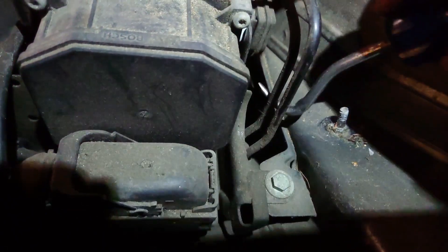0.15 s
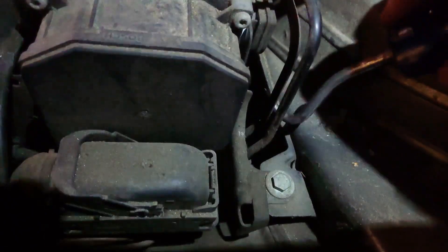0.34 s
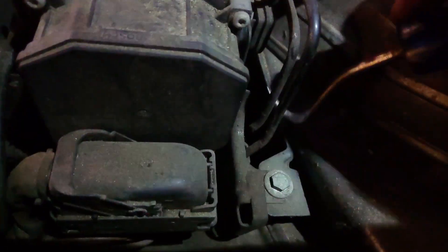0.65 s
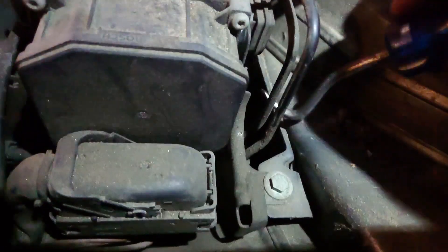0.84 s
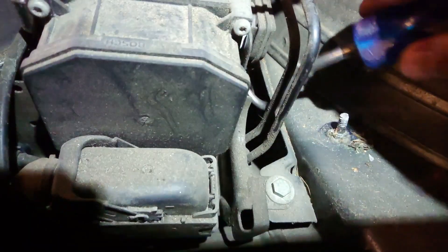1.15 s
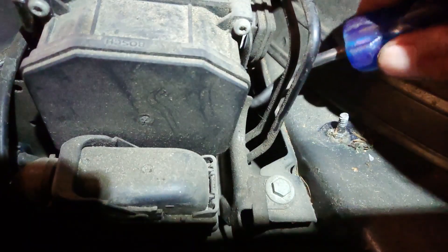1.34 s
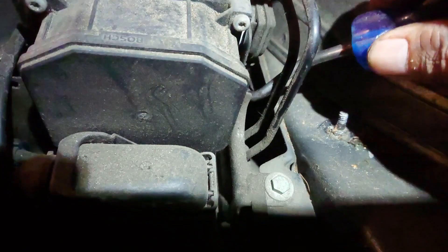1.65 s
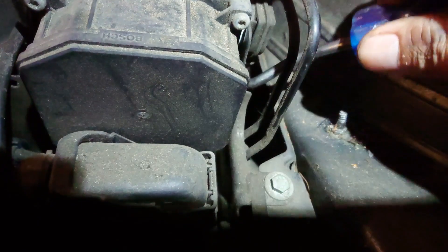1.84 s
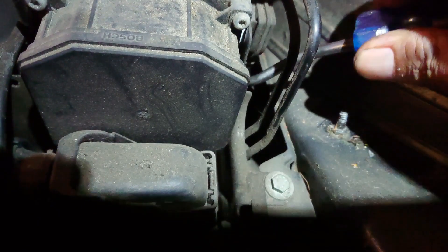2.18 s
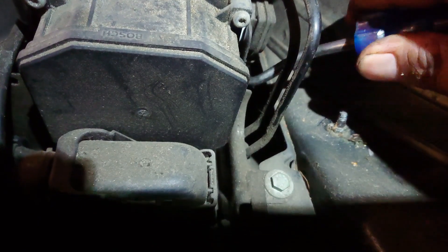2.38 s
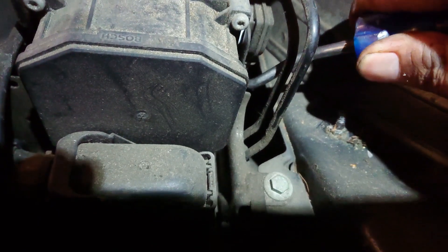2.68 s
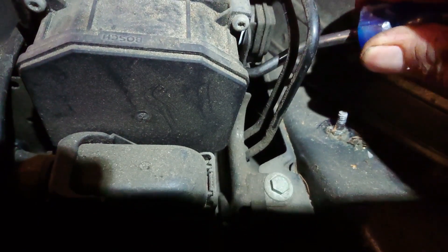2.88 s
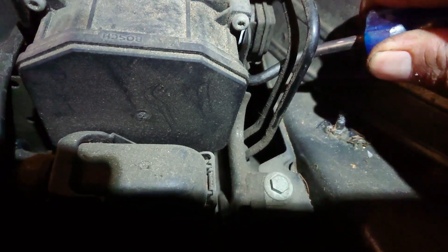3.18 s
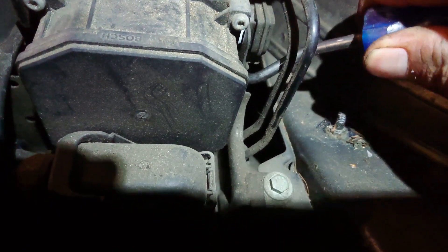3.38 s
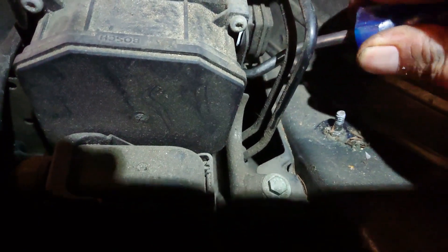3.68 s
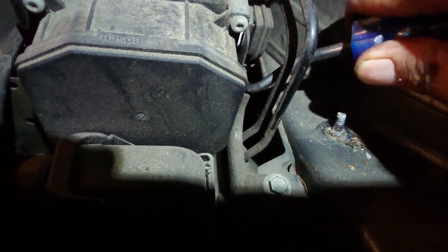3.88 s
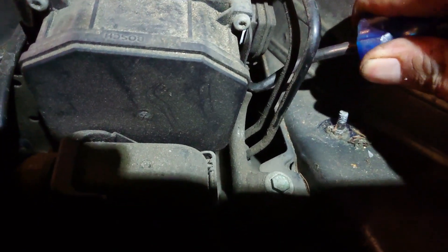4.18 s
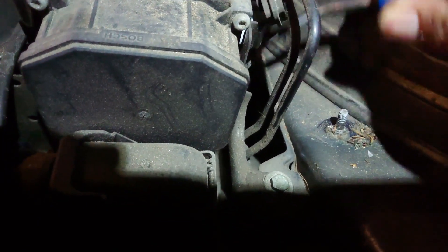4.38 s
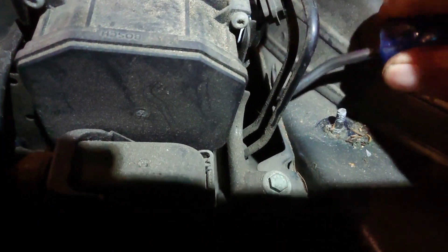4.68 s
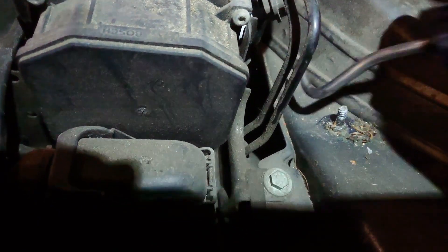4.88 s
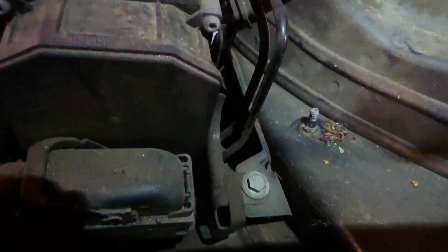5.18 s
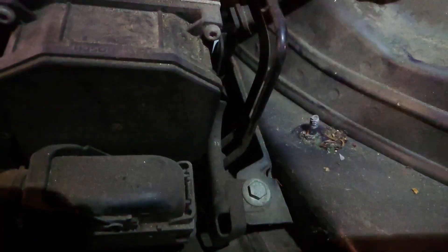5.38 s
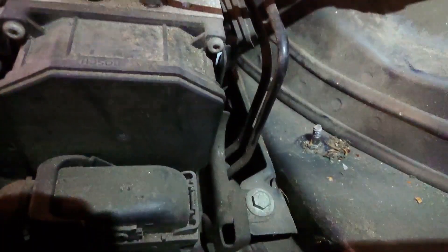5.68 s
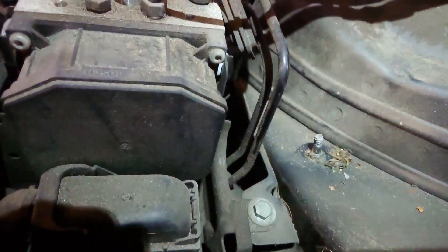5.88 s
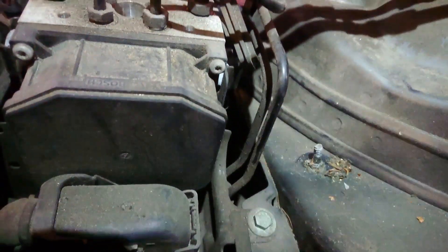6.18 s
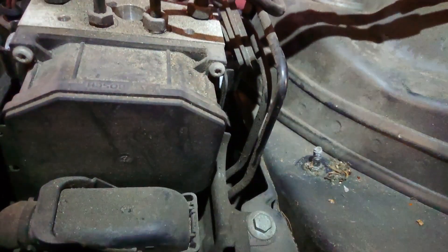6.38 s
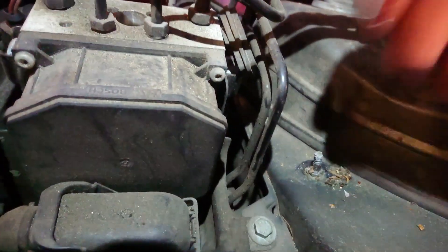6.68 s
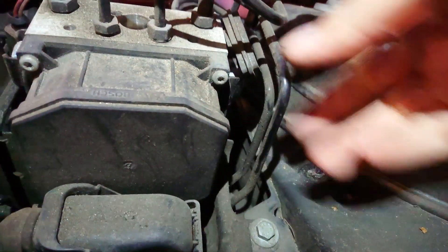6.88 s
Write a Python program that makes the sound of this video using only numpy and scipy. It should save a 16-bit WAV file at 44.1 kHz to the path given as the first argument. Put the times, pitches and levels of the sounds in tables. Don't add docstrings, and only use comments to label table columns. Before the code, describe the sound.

A hooked steel tool scrapes and taps dusty plastic in an engine bay, slips with loud snaps, then clunks and rattles down on a panel.

```python
import sys
import numpy as np
from scipy import signal
from scipy.fft import rfft, irfft
from scipy.io import wavfile
from scipy.ndimage import uniform_filter1d

SR = 44100
rng = np.random.default_rng(int(sys.argv[2]) if len(sys.argv) > 2 else 0)


def convert_level_to_amplitude(level_db):
    exponent = np.asarray(level_db, float) / 20
    return 10 ** exponent


def master(y):
    cut = np.clip(np.atleast_2d(y).T, -1, 1)
    pcm = np.round(cut * 32767)
    wavfile.write(sys.argv[1], SR, pcm.astype(np.int16))


N = 310464

# (frequency [Hz], level [dB per Hz])
AIR_COLOUR = [(15, -43.5), (25, -19), (53, 0.5), (97, -1), (214, -9.5), (273, -12.5), (378, -16.5),
              (553, -16.5), (1060, -17), (1150, -19.5), (1830, -31.5), (2900, -35.5), (7920, -63),
              (11600, -43), (16500, -65.5)]
# (frequency [Hz], likeness [-1 to 1])
AIR_LIKENESS = [(60, 1), (240, 1), (950, -0.55), (3770, -0.19), (15000, 0.79)]
# (frequency [Hz], level [dB])
WHINE = [(1125, -80)]
# (frequency [Hz], time to fall 60 dB [s])
GARAGE_DECAY = [(100, 0.49), (500, 1), (1500, 0.75), (4000, 0.66), (7000, 0.23)]

# (time [s], peak [dB])
THUDS = [
    (3.776, -33.5),
    (4.385, -32),
    (4.9995, -15),
    (5.567, -25.5),
    (5.70, -26.5),
    (5.734, -28),
    (4.993, -36),
    (5.077, -37),
]
# (time [s], peak [dB])
CLUNKS = [
    (5.733, -2),
    (5.743, -17),
    (5.7665, -8),
    (5.779, -8.5),
    (5.80, -24.5),
    (5.953, -2),
    (5.963, -12.5),
]
# (time [s], peak [dB], bass [dB], treble [dB], ring of the spot [Hz])
RATTLE = [(5.566, -7, -25.5, -19.5, 1555), (5.578, -16.5, 13, -10.5, 400), (5.587, -19.5, 3, -6.5, 4920),
          (5.607, -15, -9, -7.5, 5030), (5.629, -29, -12.5, -7, 5500), (5.635, -20, -13, -14, 1970),
          (5.652, -27, -15.5, -15.5, 2530), (5.675, -10, -19.5, -4.5, 5130), (5.6935, -5.5, -11.5, 1, 4000),
          (5.7005, -7, -25, -9, 1540), (5.704, -15, -21, -2.5, 4770), (5.716, -9.5, -10.5, -4.5, 1540),
          (5.723, -10.5, -15, -5.5, 4160), (5.752, -10.5, -2.5, 9, 3300), (5.822, -27.5, -6, -17.5, 5000),
          (5.831, -26.5, -10, -6.5, 4300), (5.866, -35, 4.5, -27, 5020), (5.977, -3, -16, -4, 3220),
          (5.993, -11.5, -3, -3.5, 2550), (6.013, 0, -20.5, -15, 3530), (6.056, -9, -11.5, -8, 3360),
          (6.0945, 0.5, -21, -10.5, 1510), (6.1775, -4, -24, -15.5, 3380),
          (6.197, -23.5, -20.5, -6.5, 3290), (6.2185, -10, -14.5, -7, 2350)]
# (time [s], peak [dB])
BUMPS = [
    (4.9998, -10),
]
# (time [s], peak [dB])
RATCHET = [
    (5.384, -33),
    (5.3895, -36),
    (5.395, -30),
    (5.4045, -22),
    (5.4158, -21.5),
    (5.425, -26),
    (5.436, -38),
]
# (time [s], peak [dB], bass [dB], treble [dB])
SHAFT_PINGS = [
    (1.721, -34, -48, -15),
    (1.894, -28, -55.5, -16.5),
    (1.96, -34, -20, 15.5),
    (4.183, -34, -47, 1),
    (4.262, -25, -17.5, 23),
    (4.499, -24, -42, -7),
]
# (time [s], peak [dB], bass [dB], treble [dB])
TICKS = [(.25, -50, -13, -20), (.533, -64, -27, -9), (1.015, -59, -39, -17), (1.166, -45, -20, -20),
         (1.338, -36, -30, 13), (4.127, -48.5, -22.5, 1), (0.775, -29.5, -22, -35),
         (2.436, -28, -15.5, -25), (2.49, -29.5, -10.5, -19.5), (2.756, -27.5, -7.5, -15),
         (2.7855, -26, -21, -24.5), (3.544, -38.5, -18.5, -14), (3.651, -37.5, 0, 2),
         (3.7165, -17.5, -20, -14), (4.019, -47.5, -25.5, 10), (4.21, -44, -36, 1.5), (4.246, -39, -19, 22),
         (4.787, -33.5, -15.5, -42.5), (5.071, -29.5, -11, -12), (5.0855, -22.5, -11, -11.5)]
# (time [s], peak [dB], bass [dB], treble [dB], ring of the spot [Hz])
TAPS = [(0.146, -27, -20, -44.5, 923), (0.9315, -23, -25, -40.5, 1310), (1.2135, -14.5, -1, -3, 650),
        (1.439, -34, -8.5, -23, 514), (1.551, -36.5, -13.5, -16.5, 2290), (1.7645, -23, -4.5, -19, 732),
        (2.6255, -20, -13, -21, 1140), (2.8735, -13.5, -10.5, -2, 4500), (2.8775, -13.5, -4, -24.5, 765),
        (2.8795, -2.5, -20, -16.5, 4260), (3.761, -21, -17.5, -20.5, 2200), (3.7645, -19, -9, -18.5, 1190),
        (3.7755, -1, -13, -9, 2170), (3.785, -13.5, 10.5, -23, 925), (6.938, -41, 2, -11.5, 930)]
# (time [s], peak [dB], bass [dB], treble [dB], ring of the spot [Hz])
SLIPS = [
    (4.384, -1.5, -15.5, -7, 2200),
    (4.3935, -1.5, -12, -5, 2120),
    (4.401, -0.5, -10, -6, 5500),
    (4.407, -4, -14, 3.5, 3590),
    (4.4125, -8, -6.5, -8, 1000),
    (4.417, -6.5, 0.5, -9, 1299),
    (4.432, -18, 0, -10, 1296),
]

# (start [s], length [s], level [dB], bass [dB], treble [dB])
BUILDING = [(1.185, 0.028, -55, -4, -33), (1.25, 0.049, -56, 1.5, -15), (1.61, 0.058, -59.5, 1.5, -19),
            (1.84, 0.082, -67, 8, -10), (2.53, 0.15, -58, -5.5, -22), (2.84, 0.04, -48, -8, -7.5),
            (3.735, 0.052, -56.5, -14.5, -17), (3.86, 0.041, -43.5, -2.5, -12.5),
            (4.73, 0.16, -52.5, -5.5, -24), (5.09, .074, -60, -2.5, -16), (6.98, 0.074, -68.5, 5, -15.5)]
# (start [s], length [s], level [dB], bass [dB], treble [dB])
SWEEPING = [(0, .12, -61, 6, -28), (.255, 0.063, -63.5, -3, -24), (.36, 0.053, -63.5, -2, -32),
            (.43, 0.075, -59.5, -6, -28), (.97, 0.082, -59.5, 6.5, -29), (1.47, 0.1, -63.5, -6, -13),
            (1.71, 0.04, -45, -10.5, -30), (2.015, 0.1, -53, -21.5, -21), (2.06, 0.062, -48.5, -7.5, -15),
            (2.92, 0.094, -58.5, 3, -13), (3.01, 0.067, -56.5, -9, -27), (3.165, 0.083, -53.5, -6.5, -39),
            (3.445, 0.092, -43.5, -13, -13.5), (4.265, 0.094, -47.5, -10, -4.5),
            (4.85, 0.067, -40, -10, -23)]
# (start [s], length [s], level [dB], bass [dB], treble [dB])
TRAILING = [(.65, 0.26, -64.5, 0.5, -20.5), (1.07, 0.089, -57.5, 0, -28), (1.3, 0.11, -57, 0.5, -10),
            (1.36, 0.072, -45, -12, -14.5), (1.78, 0.08, -52.5, -0.5, -13.5), (1.925, 0.14, -56, -9, -19),
            (2.16, 0.039, -61, -26, -5.5), (2.18, 0.45, -69, -8, -13), (2.62, 0.26, -69.5, 5.5, 0),
            (2.795, 0.12, -55.5, -5, -7), (3.245, 0.084, -54, -0.5, -10.5), (3.37, .06, -63, -22, -5.5),
            (4.05, 0.094, -55, -14, -17), (4.45, .11, -53.5, 0, -22), (4.52, 0.3, -64.5, 3, -41),
            (5.0, 0.12, -49.5, -3, -13), (5.8, 0.094, -50, 13, -25.5), (6.56, .05, -76, -25, -1)]
# (from [s], to [s])
WITHDRAWING = (4.7, 6.5)

# (frequency [Hz], level [dB per Hz])
CHASSIS = [(30, -18), (60, -2.5), (120, 1.5), (250, 0.5), (450, -10), (900, -41), (16500, -89)]
# (frequency [Hz], level [dB per Hz])
HANDLE = [(47, -55), (80, -21.5), (1300, -1.5), (2710, -16), (2900, -28), (4530, -26.5), (6610, -46),
          (13200, -45.5), (16500, -64.5)]
# (frequency [Hz], level [dB per Hz])
PANEL = [(60, -36.5), (297, -8.5), (366, -7.5), (742, -4.5), (1240, 4), (1430, 5), (1540, -0.5), (2090, -4),
         (3500, -3), (5470, -10), (7800, -23.5), (10500, -23.5), (15000, -29), (16500, -49)]
# (frequency [Hz], level [dB per Hz])
BUMP = [(53, -41.5), (90, -6.5), (414, -11), (1750, -18), (2640, -14), (3830, -27), (5080, -17.5),
        (8770, -33.5), (16500, -31)]
# (frequency [Hz], level [dB per Hz])
CLIP = [(120, -28.5), (200, -6), (1050, -4.5), (2330, -4.5), (3630, -13), (5060, -8.5), (5870, -12),
        (7600, -32.5), (8650, -37.5), (10400, -19), (16500, -38.5)]
# (frequency [Hz], level [dB per Hz])
HOUSING = [(35, -38.5), (60, 2), (213, -19.5), (350, -8), (1270, -2.5), (1800, -8), (2300, -3.5),
           (3040, -10), (4430, -4.5), (5600, -6), (7600, -17.5), (10100, -11.5), (14700, -20.5),
           (16500, -52.5)]
# (frequency [Hz], level [dB per Hz])
DUST = [(180, -31), (300, 1.5), (987, -4), (1190, 2), (1870, -3), (2360, -2), (2610, -8), (4770, -5.5),
        (5830, -10.5), (7500, -16), (9810, -17.5), (14000, -21), (15700, -21.5), (16500, -39.5)]
# (frequency [Hz], level [dB], time to fall 60 dB [s])
PANEL_MODES = [(400, -14.5, 0.2), (628, -7, 0.055), (903, -4, 0.11), (1078, -14.5, 0.12),
               (1252, 1.5, 0.036), (1555, 7.5, 0.045), (2200, -14.5, 0.06), (2473, 1.5, 0.057),
               (3290, -5, 0.084), (3590, -6.5, 0.11), (4240, -9.5, 0.043), (5100, -18, 0.091)]
# (frequency [Hz], level [dB], time to fall 60 dB [s])
RATCHET_MODES = [(1660, 12, 0.009), (2500, 2, .008), (5000, 6, 0.008)]
# (frequency [Hz], level [dB], time to fall 60 dB [s])
SHAFT_MODES = [(1950, 6.5, 0.14), (2210, -5, 0.014), (2355, 16, 0.037), (3700, -28, 0.032),
               (5500, -16, 0.038)]
# (frequency [Hz], level [dB], time to fall 60 dB [s])
HOUSING_MODES = [(405, -2.5, 0.27), (650, -7, 0.23), (746, 4.5, 0.1), (925, -5.5, 0.027),
                 (1035, -10.5, 0.21), (1257, 9.5, 0.09), (1356, -0.5, 0.036), (1497, -0.5, .06),
                 (2120, -3.5, 0.029), (2412, 5, 0.047), (2880, -10.5, 0.11), (3340, -12.5, 0.019),
                 (3940, -7.5, 0.013), (4300, -13.5, 0.013)]
# (frequency [Hz], width [Hz], level over the broad colour [dB])
DUST_PEAKS = [(930, 110, 11), (1300, 120, 11), (2300, 170, 12), (3460, 130, 9), (3920, 120, 9),
              (4400, 150, 12), (5300, 170, 11), (10400, 500, 8), (11500, 300, 7), (13500, 400, 6)]


def evened(x):
    return x / np.sqrt(np.mean(x ** 2) + 1e-20)


def read(points, hz):
    f, value = np.transpose(points)
    return np.interp(np.log(hz + 1), np.log(f + 1), value)


def add(mix, s, sound):
    part = mix[:, round(s * SR):][:, :sound.shape[1]]
    part += sound[:, :part.shape[1]]


def causal(db):
    fold = irfft(np.maximum(db, -100) * np.log(10) / 20)
    half = len(fold) // 2
    fold[1:half] *= 2
    fold[half + 1:] = 0
    return np.exp(rfft(fold))


def ports(hz, lag, pan_db, shade_db=0):
    side = np.array([[.5], [-.5]])
    late = lag * (0.38 + 0.63 / (1 + (800 / (hz + 1)) ** 3))
    louder_db = pan_db + shade_db / (1 + (2400 / (hz + 1)) ** 6)
    return convert_level_to_amplitude(side * louder_db) * np.exp(-2j * np.pi * hz * side * late / SR)


def hiss(magnitude, same, turn, size):
    a, b, c, d = rng.standard_normal(magnitude.T.shape + (4,)).T
    left, same = a + 1j * b, np.clip(same, -1, 1)
    right = same * left + np.sqrt(1 - same ** 2) * (c + 1j * d)
    z = np.array([left, right]) * magnitude * turn
    return signal.istft(z, nperseg=size, noverlap=size * 3 // 4)[1][:, :N]


def air():
    size, level_db = 4096, -52
    hz, t = np.fft.rfftfreq(size, 1 / SR), np.arange(N // 1024 + 5) * 1024 / SR
    patches = rng.standard_normal((len(t), len(hz))).T
    patches = uniform_filter1d(patches, size=20, axis=0)
    patches = evened(uniform_filter1d(patches, size=4, axis=1))
    field = convert_level_to_amplitude(read(AIR_COLOUR, hz)[:, None] + 2.7 * patches)
    drone = 1 / (1 + (2 * (hz[:, None] - 63) / 18) ** 2)
    field *= 1 + drone
    alike = read(AIR_LIKENESS, hz)[:, None] - .45
    wash = hiss(field, alike, ports(hz, lag=-0.96, pan_db=2.0)[:, :, None], size)
    wobble = np.cumsum(rng.standard_normal(N)) * .004
    whine = sum(convert_level_to_amplitude(db) * np.sqrt(2) * np.sin(2 * np.pi * f * np.arange(N) / SR + wobble) for f, db in WHINE)
    return convert_level_to_amplitude(level_db) * evened(wash) + whine


def garage(x):
    echoes = np.zeros((2, SR))
    at = np.arange(400, SR - 20, 20) + rng.integers(0, 20, (2, (SR - 401) // 20))
    np.put_along_axis(echoes, at, rng.choice([-1., 1.], at.shape), 1)
    hz, t, z = signal.stft(echoes, SR, nperseg=256)
    fade = convert_level_to_amplitude(-60 * t / read(GARAGE_DECAY, hz)[:, None])
    tail = signal.istft(z * fade, SR, nperseg=256)[1]
    tail = tail[:, :SR - 512] / np.linalg.norm(tail[0])
    return signal.oaconvolve(x.mean(0)[None], tail, axes=1)[:, :N]


def ringing(hz, modes, ring_db, spots, spot_db):
    luck = rng.standard_normal((len(modes), 2))
    crowd = 300 * 16 ** rng.random((14, 1))
    body = 1
    if len(modes) > 3:
        body = 1 + convert_level_to_amplitude(ring_db - 1.5) * (1 / (1 + 2j * (hz - crowd) / 45)).sum(0)
    for (f, db, ring), (detune, strength) in zip(modes, luck):
        width = 2.2 / np.clip(ring, .008, .09)
        level = convert_level_to_amplitude(ring_db + 0.79 * db + 0.86 * strength)
        body = body + level / (1 + 2j * (hz - f * (1 + 0.004 * detune)) / width)
    for f in spots:
        body = body + convert_level_to_amplitude(ring_db + spot_db) / (1 + 2j * (hz - f) / (30 + 0.016 * f))
    return body


def blows(rows, contact_s, t60_s, colour, modes, ring_db, lag, pan_db, same, snap,
          usual_db=(0, 0), shade_db=0, spot_db=0):
    size, lead = 6144, 22
    out = np.zeros((2, N))
    t, hz = np.arange(size) / SR, np.fft.rfftfreq(size, 1 / SR)
    bass, treble = 1 / (1 + (hz / 1400) ** 4), 1 / (1 + (3000 / (hz + 1)) ** 4)
    top = treble / (1 + (6500 / (hz + 1)) ** 8)
    fade_db = -60 * np.maximum(t - contact_s, 0) / t60_s
    alike = np.clip(same + (1 - same) / (1 + (hz / 700) ** 2), 0, 1)
    for s, peak_db, *tone in rows:
        bass_db, treble_db = np.subtract(tone[:2] or usual_db, usual_db)
        *noise, grit = rng.standard_normal((size, 3)).T
        burst = noise * np.minimum(t / 0.00091, 1) * convert_level_to_amplitude(4.3 * grit) * (1 + 1.6 * np.exp(-t / 0.0011))
        burst[:, 12] += snap
        a, b = (rfft(burst * convert_level_to_amplitude(fade_db)) * (1 - treble)
                + rfft(burst * convert_level_to_amplitude(3.1 * fade_db)) * (treble - top)
                + rfft(burst * convert_level_to_amplitude(2.8 * fade_db)) * top)
        push = np.array([a, alike * a + np.sqrt(1 - alike ** 2) * b])
        body = ringing(hz, modes, ring_db, tone[2:], spot_db)
        shape = causal(read(colour, hz) + bass * bass_db + treble * treble_db) * body
        sound = irfft(push * shape * ports(hz, lag, pan_db, shade_db), size)
        sound = np.roll(sound, lead, axis=1)
        sound[:, -2048:] *= np.linspace(1, 0, 2048)
        add(out, s - lead / SR, sound * convert_level_to_amplitude(peak_db) / abs(sound).max())
    return out


def thuds():
    return blows(THUDS, .001, .03, CHASSIS, [], ring_db=0, lag=20, pan_db=6, same=0.24, snap=23)


def clunks():
    return blows(CLUNKS, .0006, 0.13, HANDLE, PANEL_MODES, ring_db=5.5, lag=13, pan_db=0.4,
                 same=0.26, snap=24, shade_db=-7.5)


def rattle():
    return blows(RATTLE, 0.0053, 0.09, PANEL, PANEL_MODES, ring_db=2.0, lag=16, pan_db=5,
                 same=0.31, snap=9.4, usual_db=(-14.5, -14), shade_db=-8.0, spot_db=4.5)


def bump():
    return blows(BUMPS, 0.00087, 0.014, BUMP, [], ring_db=0, lag=2.7, pan_db=8.5, same=0.22, snap=62)


def ratchet():
    return blows(RATCHET, .0002, .006, CLIP, RATCHET_MODES, ring_db=8, lag=3, pan_db=1.5, same=.8, snap=25)


def shaft_pings():
    return blows(SHAFT_PINGS, 0.0057, 0.086, HOUSING, SHAFT_MODES, ring_db=6.0, lag=-10.5, pan_db=5.5,
                 same=0.6, snap=2.64, usual_db=(-35, -8.5))


def ticks():
    return blows(TICKS, 0.0008, 0.043, CLIP, [], ring_db=0, lag=13, pan_db=2.0,
                 same=0.28, snap=10.0, usual_db=(-14, -15))


def strokes(withdrawing):
    kinds = (BUILDING, 0.71), (SWEEPING, 0.41), (TRAILING, 0.029)
    first, last = WITHDRAWING
    chosen = []
    for rows, share in kinds:
        for s, length, *tone in rows:
            if (first < s < last) == withdrawing:
                chosen.append((s, share * length, (1 - share) * length, *tone))
    return chosen


def rubbing(rows, lag, pan_db, ring_db, rest_db):
    hz, t = np.fft.rfftfreq(512, 1 / SR), np.arange(N // 128 + 5) * 128 / SR
    bass, treble = 1 / (1 + (hz / 1650) ** 6), 1 / (1 + (7500 / (hz + 1)) ** 8)
    power = np.zeros((len(hz), len(t)))
    for s, rise, fall, level_db, bass_db, treble_db in rows:
        rings = 0
        for f, width, db in DUST_PEAKS:
            strength, detune = rng.standard_normal(2)
            off = hz - f - .025 * f * detune
            rings = rings + convert_level_to_amplitude(db + ring_db + 3.5 * strength) / (1 + (2 * off / width) ** 2)
        crowd = 400 * 36 ** rng.random((30, 1))
        rings = rings + convert_level_to_amplitude(ring_db + 6.5) * (1 / (1 + ((hz - crowd) / 55) ** 2)).sum(0)
        colour = convert_level_to_amplitude(read(DUST, hz)) * (1 + rings)
        tone_db = bass * (bass_db - 1.5) + treble * (treble_db + 20.0)
        colour *= convert_level_to_amplitude(tone_db + level_db + 8) / np.linalg.norm(colour)
        pressure = np.interp(t, [s, s + rise, s + rise + fall], [0, 1, 0])
        power[:, pressure > 0] += np.outer(colour, pressure[pressure > 0]) ** 2
    power += convert_level_to_amplitude(read(DUST, hz) + rest_db - 11 * treble)[:, None] ** 2
    stutter = evened(uniform_filter1d(rng.standard_normal(len(t)), size=2))
    alike = 0.3 + 0.46 / (1 + (hz / 700) ** 2)
    field = np.sqrt(power) * convert_level_to_amplitude(3.2 * stutter)
    return hiss(field, alike[:, None], ports(hz, lag, pan_db)[:, :, None], size=512)


def scraping():
    at_housing = rubbing(strokes(False), lag=-9.5, pan_db=2.5, ring_db=-1.0, rest_db=-84.5)
    way_out = rubbing(strokes(True), lag=16, pan_db=-4.5, ring_db=-8, rest_db=-np.inf)
    return at_housing + way_out


def taps():
    return blows(TAPS, 0.0038, 0.085, HOUSING, HOUSING_MODES, ring_db=5.5, lag=-10.0, pan_db=2.5,
                 same=0.12, snap=7, usual_db=(-10.5, -16.5), shade_db=1.0, spot_db=0)


def slips():
    return blows(SLIPS, 0.0059, 0.058, HOUSING, HOUSING_MODES, ring_db=1, lag=-13.5, pan_db=5,
                 same=0.1, snap=4.4, shade_db=1.5, spot_db=6.5)


def scene():
    tool = thuds() + clunks() + rattle()
    bay = bump() + ratchet() + shaft_pings() + ticks() + scraping() + taps() + slips()
    echo = garage(convert_level_to_amplitude(-25.5) * bay + convert_level_to_amplitude(-22.5) * tool)
    return air() + echo + tool + bay


def roll_off(x):
    return signal.sosfilt(signal.butter(12, 16660, fs=SR, output="sos"), x)


def record(dry):
    hz = np.fft.rfftfreq(8192, 1 / SR)
    notch_db = -11 / (1 + ((hz - 8000) / 1100) ** 4)
    bass_loss_db = 10 * np.log10(1 + (44 / (hz + 1)) ** 8)
    top_loss_db = 10 * np.log10(1 + (hz / 16300) ** 200)
    colour = causal(notch_db - bass_loss_db - top_loss_db)
    heard = signal.oaconvolve(dry, irfft(colour)[None], axes=1)[:, :N]
    rounded = heard / (1 + (heard / .92) ** 6) ** (1 / 6)
    return roll_off(rounded)


dry = scene()
out = record(dry)
master(out)
```